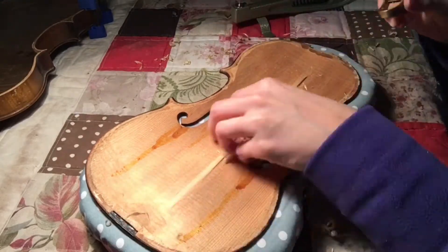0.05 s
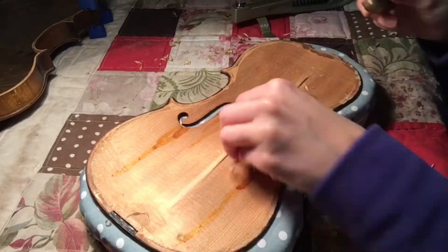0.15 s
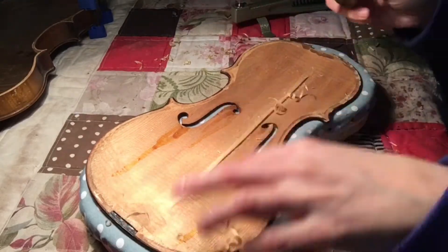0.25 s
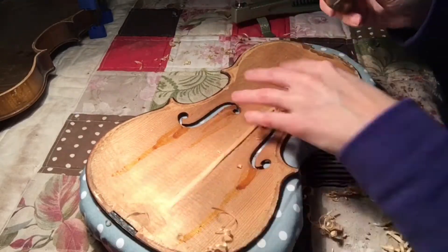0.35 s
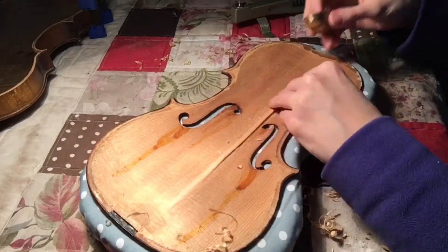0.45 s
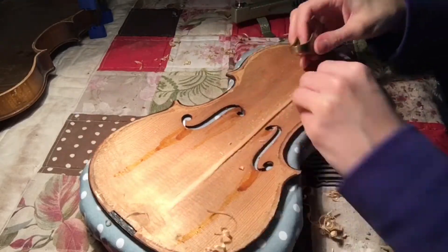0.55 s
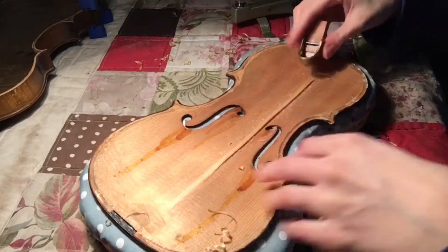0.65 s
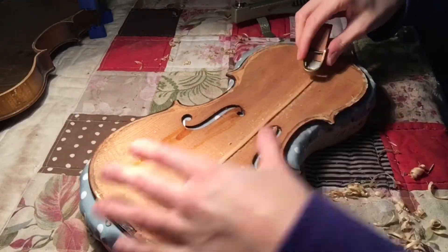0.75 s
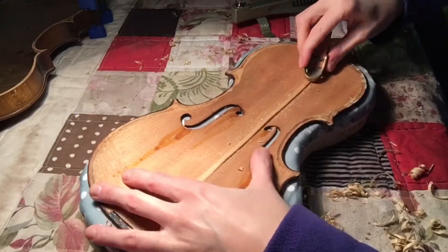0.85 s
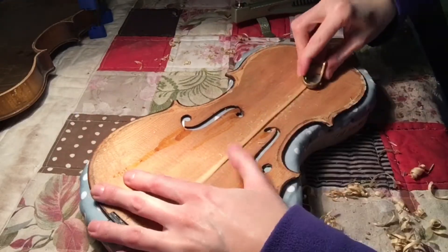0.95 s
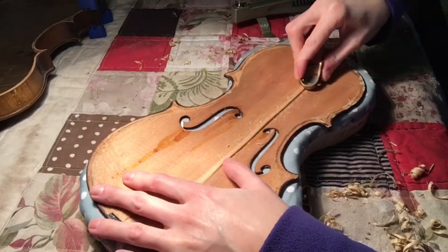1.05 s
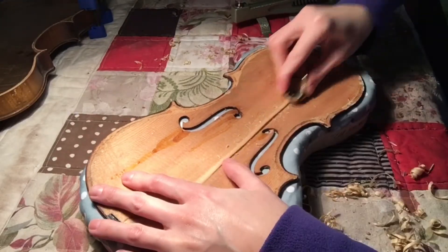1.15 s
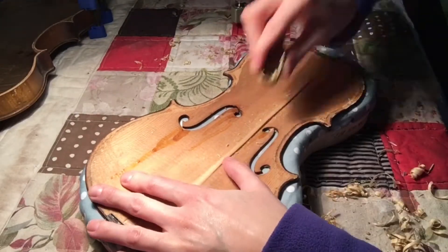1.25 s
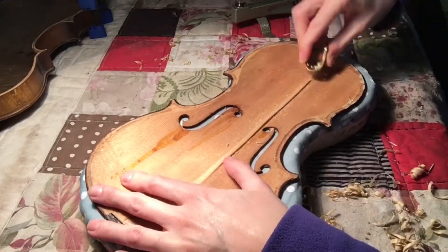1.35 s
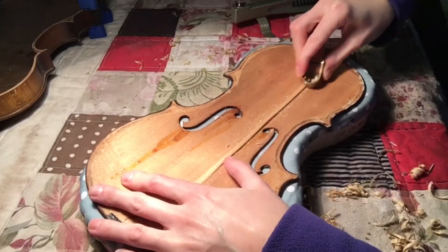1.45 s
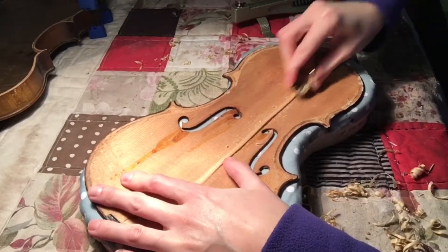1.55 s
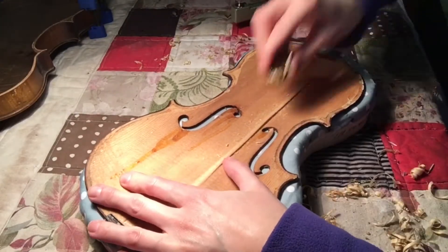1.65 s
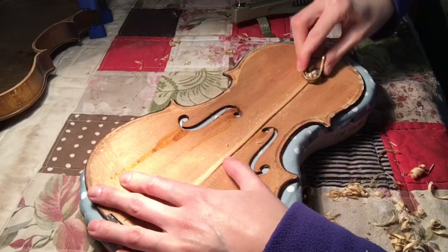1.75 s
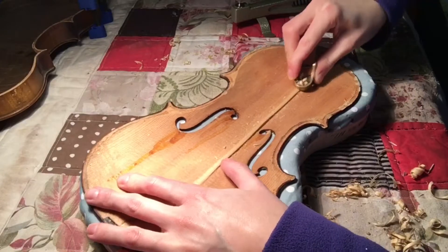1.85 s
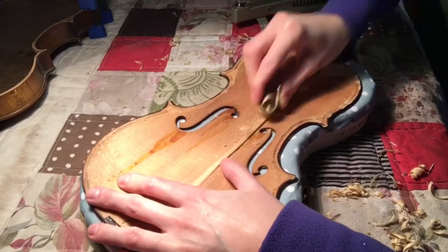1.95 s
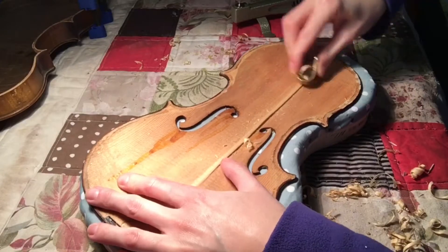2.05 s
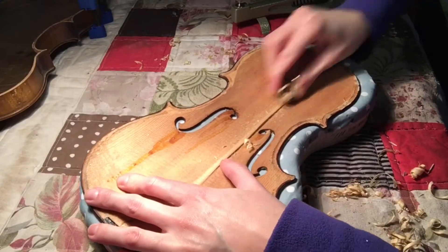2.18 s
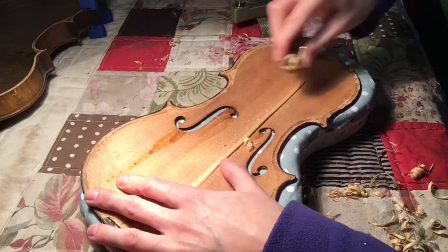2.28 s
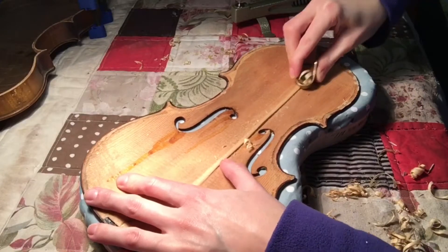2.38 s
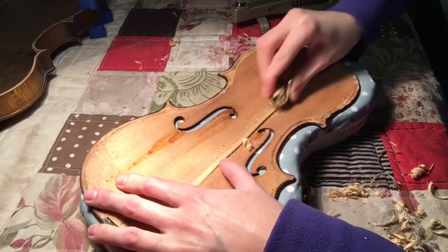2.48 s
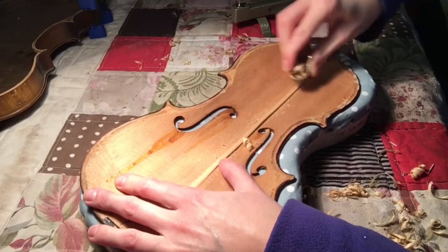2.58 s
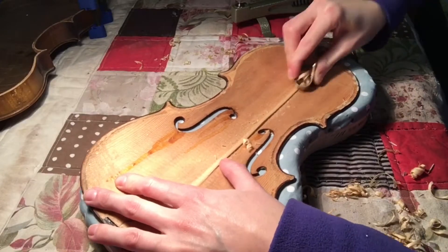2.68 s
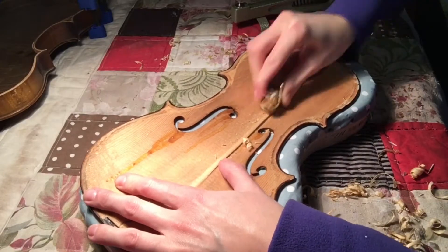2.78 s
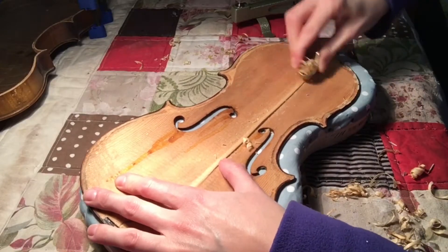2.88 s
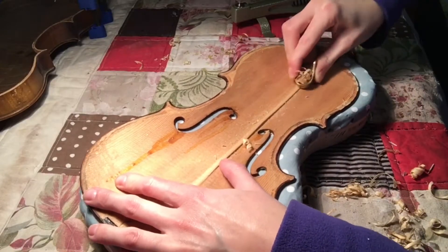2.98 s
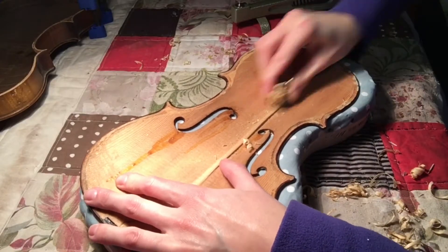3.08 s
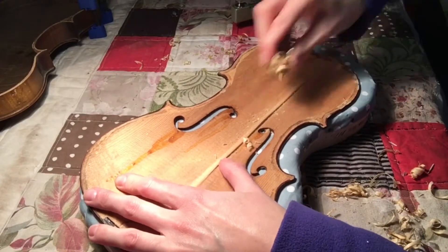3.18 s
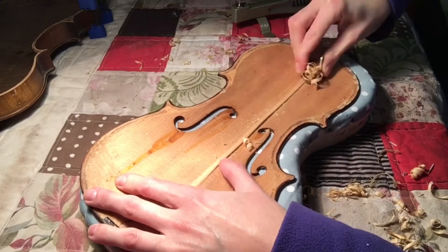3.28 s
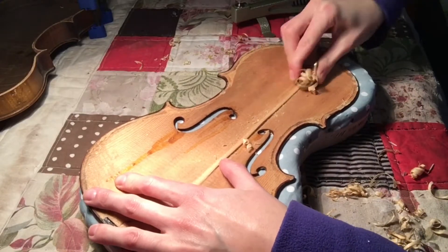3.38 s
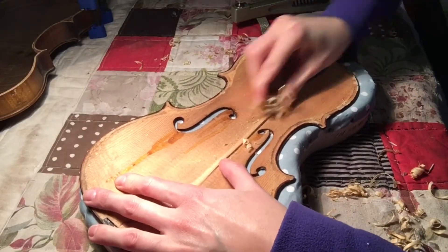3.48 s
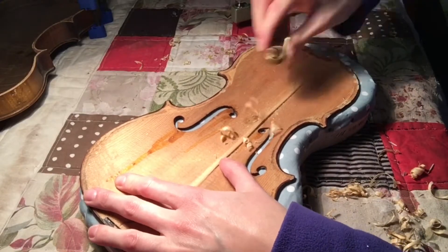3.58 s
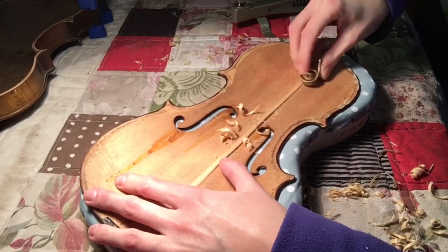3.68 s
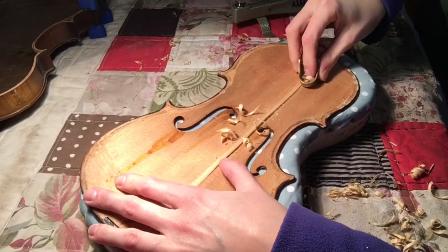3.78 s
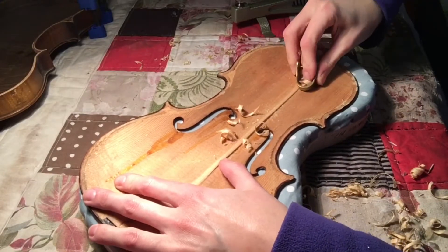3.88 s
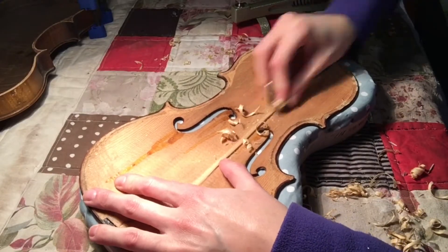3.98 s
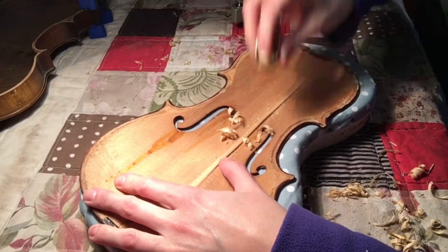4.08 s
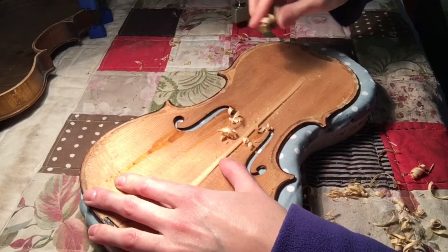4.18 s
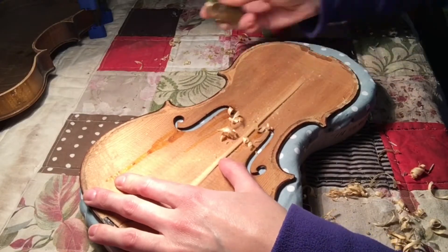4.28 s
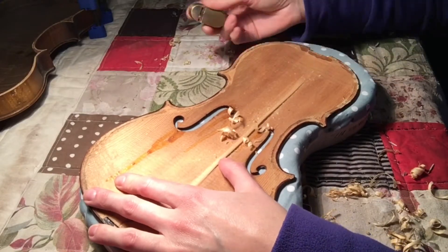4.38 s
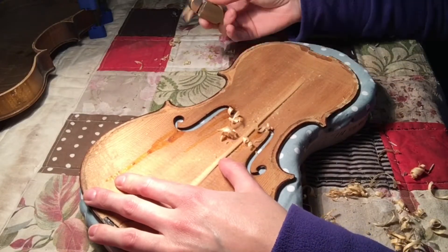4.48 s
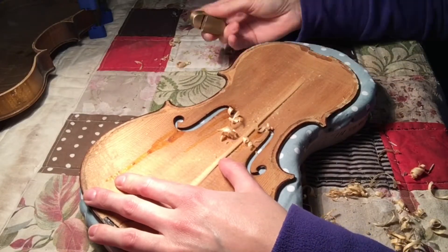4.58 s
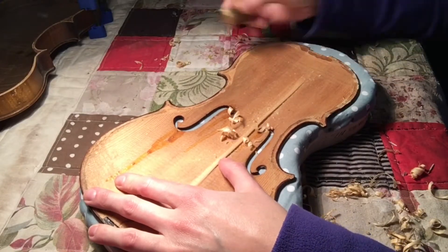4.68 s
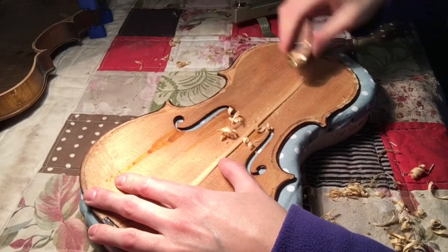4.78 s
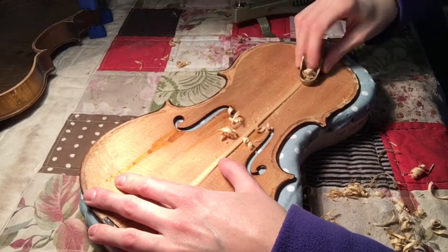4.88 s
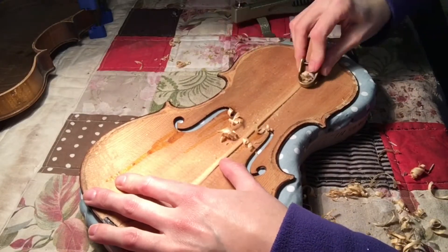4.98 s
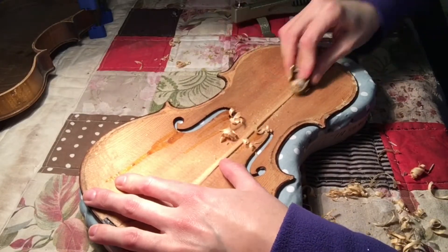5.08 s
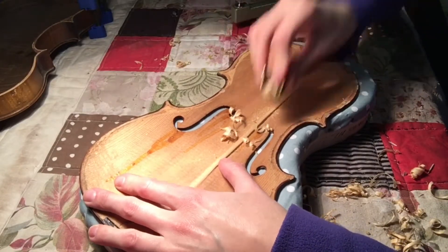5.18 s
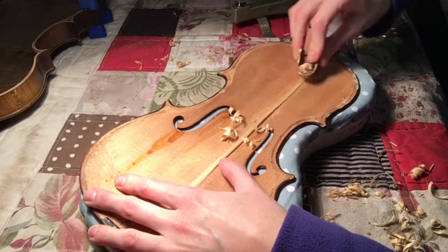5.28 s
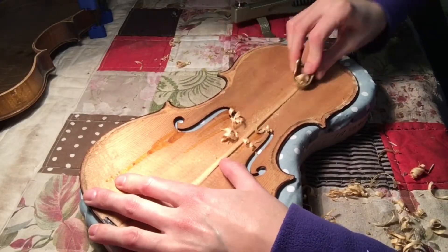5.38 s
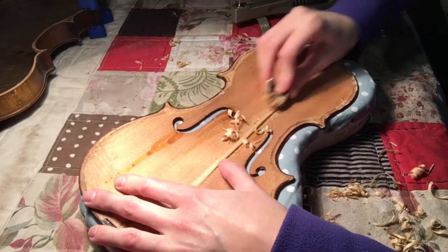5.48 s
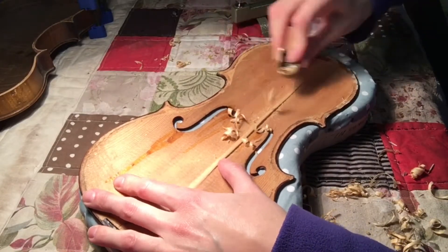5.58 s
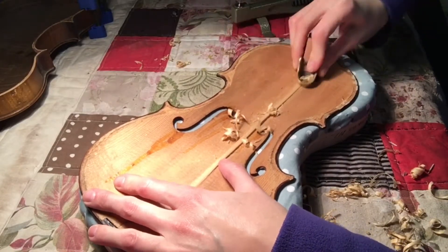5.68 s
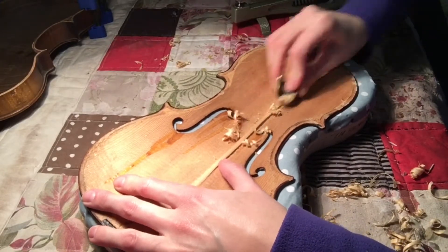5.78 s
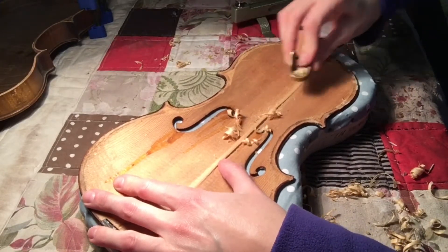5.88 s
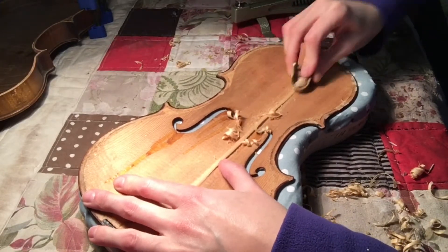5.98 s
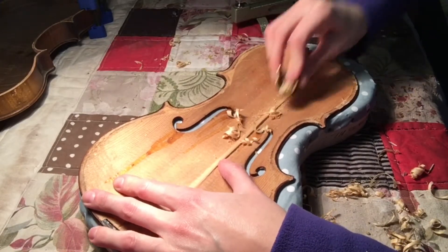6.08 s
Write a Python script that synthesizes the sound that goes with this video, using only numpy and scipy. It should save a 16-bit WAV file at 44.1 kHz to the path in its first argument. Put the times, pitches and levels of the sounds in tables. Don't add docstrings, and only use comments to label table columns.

```python
import sys
import numpy as np
from scipy import signal
from scipy.fft import rfft, irfft
from scipy.io import wavfile
from scipy.ndimage import uniform_filter1d

SR = 44100
rng = np.random.default_rng(int(sys.argv[2]) if len(sys.argv) > 2 else 0)


def natural_amplitude(level_db):
    exponent = np.asarray(level_db, float) / 20
    return 10 ** exponent


def log_audio(samples):
    frames = np.atleast_2d(samples).T
    limited = np.clip(frames, -1, 1)
    pcm = np.round(limited * 32767).astype(np.int16)
    wavfile.write(sys.argv[1], SR, pcm)


N = 270774
STEP = 20

# edge bites in seconds, time in the wood in seconds, run-up in seconds per 20 dB,
# plate bending in dB, blade chatter in dB.
CUTS = [(1.192, 0.053, 0.05, -35.5, -27.5), (1.603, 0.047, -0.017, -32.5, -33),
        (1.943, 0.033, 0.0638, -34, -32.5), (2.215, 0.044, .05, -30.5, -32.5),
        (2.476, 0.054, 0.0468, -30.5, -38), (2.758, 0.059, 0.03, -35, -34),
        (3.106, 0.053, .045, -31.5, -32.5), (3.499, 0.047, 0.0651, -30.5, -31),
        (3.992, 0.077, .09, -36.5, -34), (5.135, 0.057, 0.07, -34, -35), (5.475, 0.069, 0.0519, -34.5, -35),
        (5.796, 0.056, 0.04, -36.5, -39), (6.043, 0.055, -0.0155, -37.5, -42)]
# favoured bending in Hz, chatter in the run-up in Hz,
# chatter at the exit in Hz, fibre hiss in dB, chatter at the bite in dB.
PLACES = [(343, 1400, 1320, -44, -48), (352, 830, 1300, -44, -43.5), (396, 1600, 1540, -43.5, -41),
          (320, 1800, 1420, -44, -41), (370, 2100, 1660, -45.5, -41.5), (382, 1490, 1310, -45.5, -43.5),
          (341, 1400, 1300, -44.5, -44), (373, 1500, 1170, -44, -40), (310, 2150, 1000, -46, -47),
          (308, 940, 1430, -45, -47), (326, 1700, 1450, -45.5, -47.5), (326, 1520, 1420, -44, -39.5),
          (348, 1200, 1430, -46, -47)]
# start in seconds, length in seconds, plate in dB, hiss in dB,
# treble of the hiss in dB.
GLIDES = [(1.08, 0.051, -59.5, -63, -31), (1.291, 0.0058, -66, -56.5, -15), (1.464, .015, -68, -58.5, -7.5),
          (1.51, 0.028, -65, -64.5, 2), (1.545, 0.042, -49.5, -61.5, -1), (1.857, 0.018, -65, -61.5, -1),
          (1.906, .015, -48.5, -57, -19.5), (2.962, 0.042, -61, -70, -2.5),
          (3.005, 0.0054, -64, -55.5, -3.5), (3.328, .015, -84, -71, -17), (3.367, 0.022, -63, -65.5, -0.5),
          (3.449, 0.015, -68, -61, 6), (3.655, 0.027, -84, -72, -21), (3.759, 0.024, -62.5, -68, 2),
          (3.897, 0.0088, -60.5, -61.5, -31), (4.129, 0.043, -75, -70.5, 5.5),
          (4.934, 0.017, -68, -69, -8.5), (4.959, 0.0041, -66, -76.5, -5), (5.031, 0.0067, -72, -78, 4),
          (5.073, 0.022, -59, -60.5, -28), (5.4, 0.025, -60, -56, -2), (5.657, 0.0043, -93, -78.5, 9),
          (5.741, 0.013, -58, -55.5, -6), (6.013, 0.036, -46.5, -53, -3.5)]
# time in
# seconds, # knock in dB, chatter in dB, click in dB, contact in seconds.
LANDINGS = [(0.713, -70, -41.5, -43, 0.004), (1.04, -44, -38.5, -70, 0.0065),
            (1.088, -71.5, -30, -44, 0.019), (1.133, -45.5, -33, -36.5, 0.0082),
            (1.464, -55, -62, -64, 0.0083), (1.592, -30, -34, -36, 0.01), (1.816, -34.5, -46, -63.5, 0.004),
            (2.123, -30, -31, -45.5, 0.0096), (2.206, -22, -47, -40, 0.012), (2.386, -52, -50, -62, 0.0077),
            (2.408, -25, -21.5, -44, 0.0047), (2.674, -34.5, -34, -41.5, 0.0097),
            (2.734, -36.5, -48, -45, 0.0088), (2.714, -46, -52, -52, 0.01),
            (2.928, -55.5, -58, -74.5, 0.014), (5.358, -52, -51, -62.5, .008),
            (2.452, -54, -50, -52, 0.0065), (3.72, -28, -27, -42, 0.013), (4.041, -32, -23, -36, 0.018),
            (5.379, -30, -31.5, -45.5, 0.0065), (5.715, -32.5, -31.5, -40, 0.0098),
            (5.79, -23, -28, -34, 0.0057), (5.983, -34, -36, -58, 0.014), (6.003, -29, -26, -63, 0.0031)]
# pitch in Hz, width in Hz, level in dB.
BENDING = [(97, 13, -3.5), (136.4, 10.8, 4), (194.5, 19.7, 2), (249.5, 26, -3.5), (328.4, 31.4, -5),
           (395, 30, -8), (451.6, 46, -5), (502.5, 29, -2.5), (569, 44, -5), (656, 32, -2), (713, 57, -7)]
# pitch in Hz, width in Hz, level in dB.
CHATTER = [(836, 136, -7), (1008, 87, -2.5), (1093, 52, 0.5), (1242, 106, -0.5), (1316, 86, 1.5),
           (1436, 87, -6), (1490, 25, -16), (1512, 103, -1.5), (1647, 116, 0), (1766, 93, -3),
           (2035, 120, -5.5), (2319, 40, -9)]
# pitch in Hz, width in Hz, level in dB.
AFTER_RING = [(1425, 10, -1)]
# pitch in Hz, width in Hz, level in dB.
METAL_RINGS = [(2840, 110, 2), (3530, 110, 3), (4150, 120, -3), (5450, 150, -1), (6350, 130, -1),
               (8480, 120, -1)]
# pitch in Hz, level in dB per Hz.
FIBRES = [(1290, -18.5), (2200, -2.5), (3210, -5.5), (4030, -2.5), (4950, -5), (5640, -3), (7950, -9.5),
          (8770, -10.5), (12500, -17.5), (15600, -17.5)]
# pitch in Hz, width in Hz, level in dB.
KNOCK = [(252, 63, -7), (335, 70, -10), (447, 76, -2), (650, 100, -6), (850, 120, -11)]
# pitch in Hz, level in dB per Hz.
CLICK = [(1060, -28.5), (1800, -1), (2490, 0.5), (2900, 7.5), (4090, -2.5), (5130, -3.5), (8500, -13),
         (15600, -51)]
# time in seconds, level in dB.
SHOVES = [(.17, -84), (.58, -70), (1.152, -57), (1.27, -54), (1.59, -55), (1.69, -79), (1.95, -47.5),
          (2.25, -56), (2.52, -62), (2.8, -59.5), (3.1, -55), (3.46, -56.5), (3.56, -61), (3.96, -55),
          (4.1, -56), (5.17, -49), (5.48, -55), (5.84, -43), (6.1, -45)]
# start in seconds, length in seconds, fade in seconds per 20 dB,
# rustle in dB, crisp top in dB.
HAND = [(0.096, 0.043, 0.1, -46.5, -55), (0.188, 0.016, 0.05, -74, -65), (.25, 0.081, .08, -93, -73.5),
        (0.443, 0.011, 0.12, -64, -93), (0.47, 0.077, 0.03, -57.5, -59.5), (0.63, 0.017, 0.5, -88, -87),
        (0.597, 0.0086, 0.0351, -55, -57), (0.717, 0.005, 0.02, -55, -56.5),
        (0.858, 0.046, 0.03, -61, -70.5), (0.945, 0.0066, -0.36, -64.5, -70),
        (0.966, 0.01, 0.37, -57.5, -67.5), (4.23, 0.015, 0.2, -86, -79), (4.599, .006, 0.4, -81.5, -84.5)]
# pitch in Hz, level in dB per Hz.
RUSTLE = [(59, -48), (100, -19), (124, -6.5), (161, -16), (489, -12.5), (1060, 1), (1150, -3), (1440, -1),
          (2350, -9.5), (3320, -7), (5000, -24), (6500, -49), (11000, -120)]
# pitch in Hz, level in dB per Hz.
CRISP = [(2060, -18), (3500, -10.5), (3870, -8), (4440, -1.5), (4930, -7.5), (5950, 1.5), (8490, -12),
         (15600, -14)]
# start in seconds, length in seconds,
# fade in seconds per 20 dB, level in dB.
PICKS = [
    (0.689, 0.01, 0.04, -64),
    (4.448, 0.016, 0.1, -72),
    (4.485, 0.0089, 0.12, -70),
    (4.512, 0.016, 0.02, -60),
    (4.652, 0.016, 0, -73),
    (4.679, 0.021, .04, -70),
]
# pitch in Hz, level in dB per Hz.
PICKING = [(710, -26), (1200, -4), (1280, -15), (1410, -7), (1800, -1), (2260, -4), (6260, -0.5),
           (15600, -8.5)]
# time in seconds, pitch in Hz, level in dB.
TICKS = [
    (4.652, 8480, -65),
    (5.655, 4100, -63),
]
# pitch in Hz, level in dB per Hz.
SHOP = [(15, -44.5), (25, -19), (49, -6), (70, -21), (91, -12), (133, -13), (282, -14), (323, -13),
        (422, -17.5), (873, -21), (999, -23), (1420, -21), (15600, -44)]

SLIPS_PER_S, SLIP_SCATTER_DB, JUDDER_DB = 4400, 1.5, 1.8
PATCH_DB = 2.2
BEND_EXIT_DB, BEND_FALL_S, BEND_TAIL_DB, BEND_TAIL_S = -43.5, 0.039, -22.5, 0.11
CHATTER_TOP_S, CHATTER_FALL_S, CHATTER_TAIL_DB, CHATTER_TAIL_S = 0.014, 0.032, -29, 0.12
HISS_GROWS_DB, HISS_FALL_S, TREBLE_HZ = 4, 0.043, 4420
GLIDE_RISE_S, GLIDE_FALL_S = 0.027, 0.022
BEND_TRAVEL, BITE_CHATTER_HZ, LIFT_BEND_HZ, LIFT_CHATTER_HZ, LIFT_S = 1.034, 1520, 190, 1280, 0.073
SWELL_DB, SWELL_RISE_S, SWELL_FALL_S = -16.5, 0.045, 0.06
TABLE_HZ, TABLE_WIDTH_HZ = 59, 16
ROCK_REST_DB, ROCK_HOLD_S, ROCK_RISE_S, ROCK_FALL_S = -81, 0.027, 0.1, 0.093
PICK_RISE_S = 0.023
SHOP_DB = -73.5
ROOM_T60_S, ROOM_DB = 0.21, -23.5


def plane():
    bend, chatter, hiss, treble = forces()
    bend_hz, chatter_hz = travel()
    on_wood = np.arange(N) > (GLIDES[0][0] - 2 * GLIDE_RISE_S) * SR
    grip = natural_amplitude(JUDDER_DB * walk(90))
    catch = catches(260, 0.3, 0.87)
    blade = (unit(slips(SLIPS_PER_S, SLIP_SCATTER_DB)) + 0.8 * catch) * grip ** 1.16 * on_wood
    sole = (catch + 0.77 * unit(slips(2500, 0.97))) * grip * on_wood
    fibres = (unit(slips(18000, 0.35)) + 0.36 * catch) * grip ** 0.24 * on_wood
    fibres = patchy(fibres, PATCH_DB, 18)
    low_reach = coupling(BENDING, bend_hz, 0.21, 0.53)
    high_reach = coupling(CHATTER, chatter_hz, 0.2, 0.72)
    plate = driven(sole, bend, lambda x: ring(x, BENDING, low_reach))
    plate += driven(patchy(blade, PATCH_DB, 30), chatter, lambda x: ring(x, CHATTER, high_reach))
    tearing = driven(fibres, hiss, lambda x: colour(metal(x), FIBRES))
    top = signal.sosfilt(signal.butter(2, TREBLE_HZ, "high", fs=SR, output="sos"), tearing)
    low = signal.sosfilt(signal.butter(2, TREBLE_HZ, "low", fs=SR, output="sos"), tearing)
    return plate + ring(plate, AFTER_RING) + low - top * treble / hiss + landings()


def forces():
    out = 0
    for (s, hold, rise, bend_db, chatter_db), (*_, hiss_db, bite_db) in zip(CUTS, PLACES):
        bend = shape(s, hold, rise, BEND_FALL_S, bend_db, BEND_EXIT_DB)
        bend_tail = shape(s, hold, rise, BEND_TAIL_S, bend_db + BEND_TAIL_DB)
        growing = shape(s, hold - CHATTER_TOP_S, 0.99 * rise, CHATTER_FALL_S, bite_db, chatter_db)
        scream = shape(s + hold - CHATTER_TOP_S, CHATTER_TOP_S, 0.01, CHATTER_FALL_S, chatter_db)
        chatter_tail = shape(s, hold, rise, CHATTER_TAIL_S, chatter_db + CHATTER_TAIL_DB)
        hiss = shape(s, hold, 1.23 * rise, HISS_FALL_S, hiss_db - HISS_GROWS_DB, hiss_db)
        treble = shape(s, hold, 0.89 * rise, 0.58 * HISS_FALL_S, hiss_db - HISS_GROWS_DB, hiss_db)
        chatter = np.maximum(growing, scream) + chatter_tail
        out = out + np.array([bend + bend_tail, chatter, hiss, treble])
    for s, hold, plate_db, hiss_db, treble_db in GLIDES:
        db = np.array([plate_db, plate_db - 0.7, hiss_db, hiss_db + treble_db])
        out = out + natural_amplitude(db)[:, None] * shape(s, hold, GLIDE_RISE_S, GLIDE_FALL_S, 0)
    return full(out, 0.0092)


def travel():
    s, hold, rise = np.transpose(CUTS)[:3]
    bend, early, late = np.transpose(PLACES)[:3]
    at = np.transpose([s - rise, s, s + hold, s + hold + LIFT_S]).ravel()
    low = [bend * BEND_TRAVEL ** 2, bend * BEND_TRAVEL, bend, np.full_like(s, LIFT_BEND_HZ)]
    high = [early, np.full_like(s, BITE_CHATTER_HZ), late, (late + LIFT_CHATTER_HZ) / 2]
    t = np.arange(N) / SR
    return [np.interp(t, at, np.transpose(hz).ravel()) for hz in (low, high)]


def catches(per_s, jitter, scatter_db):
    chance = rng.standard_normal((N // 50, 2)).T
    at = np.cumsum(SR / per_s * np.exp(jitter * chance[0])).astype(int)
    force = np.zeros(N)
    force[at[at < N]] = natural_amplitude(scatter_db * chance[1])[at < N]
    return unit(force - force.mean())


def slips(per_s, scatter_db):
    happens = rng.random(N) < per_s / SR
    return happens * rng.standard_normal(N) * natural_amplitude(scatter_db * rng.exponential(size=N))


def metal(x):
    return x + 0.5 * ring(x, METAL_RINGS, (-1) ** np.arange(len(METAL_RINGS)))


def landings():
    t = np.arange(0, N + STEP, STEP) / SR
    push = 0
    for s, knock_db, chatter_db, click_db, contact in LANDINGS:
        u = (t - s - 0.004) / np.clip(contact, 0.002, 0.03)
        press = np.exp(-np.where(u < 0, 1.32 * u ** 2, np.sqrt(1 + (1.52 * u) ** 2) - 1))
        faint_swell = shape(s, contact, SWELL_RISE_S, SWELL_FALL_S, SWELL_DB)
        push = push + natural_amplitude(np.array([[knock_db], [chatter_db], [click_db]]) - 11) * (press + faint_swell)
    knock_push, chatter_push, click_push = full(push, 0.001)
    scuff = slips(15000, 0.46)
    reach = coupling(CHATTER, 1470.0, 0.1, 1.0)
    knock = driven(scuff, knock_push, lambda x: ring(x, KNOCK))
    chatter = driven(scuff, chatter_push, lambda x: ring(x, CHATTER, reach))
    click = driven(scuff, click_push, lambda x: colour(metal(x), CLICK))
    return knock + chatter + click


def table():
    shove = 0
    for s, db in SHOVES:
        shove = shove + shape(s - ROCK_HOLD_S / 2, ROCK_HOLD_S, ROCK_RISE_S, ROCK_FALL_S, db)
    gain = natural_amplitude(ROCK_REST_DB) + full(shove, 0.027)

    def rock(x):
        return ring(ring(x, [(TABLE_HZ, TABLE_WIDTH_HZ, 0)]), [(TABLE_HZ, 30, 0)])

    return driven(rng.standard_normal(N), gain, rock)


def hand():
    gain = 0
    for s, hold, fade, *db in HAND:
        gain = gain + natural_amplitude(np.array(db))[:, None] * shape(s, hold, 0.033, fade, 0)
    rustle, crisp = full(gain, 0.008)
    curls = patchy(slips(15000, 0.47), PATCH_DB, 21)
    return rustle * unit(colour(curls, RUSTLE)) + crisp * unit(colour(curls, CRISP))


def picking():
    gain = full(sum(shape(s, hold, PICK_RISE_S, fade, db) for s, hold, fade, db in PICKS), 0.0066)
    return gain * unit(colour(slips(12000, 0.8), PICKING))


def ticks():
    t = np.arange(N) / SR
    out = 0
    for s, hz, db in TICKS:
        decay = (t > s) * np.exp(-abs(t - s) / 0.0084)
        out = out + natural_amplitude(db) * decay * np.sin(2 * np.pi * hz * t)
    return out


def shop():
    return natural_amplitude(SHOP_DB + 0.8 * walk(3)) * unit(colour(rng.standard_normal(N), SHOP))


def unit(x):
    return x / np.sqrt(np.mean(x ** 2))


def colour(x, points):
    hz, db = np.transpose(points)
    f = np.arange(N // 2 + 1) * SR / N + 1
    return irfft(rfft(x) * natural_amplitude(np.interp(np.log(f), np.log(hz), db, left=-90, right=-90)), N)


def ring(force, modes, reach=None):
    out = 0
    for k, (hz, width_hz, db) in enumerate(modes):
        push = force if reach is None else force * reach[k]
        b, a = signal.iirpeak(hz, hz / width_hz, SR)
        out = out + (-1) ** k * natural_amplitude(db) * signal.lfilter(b, a, push)
    return out


def coupling(modes, favoured_hz, spread, rest):
    hz, width_hz, db = np.transpose(modes)[:, :, None]
    reach = rest + np.exp(-0.5 * (np.log(hz / favoured_hz) / spread) ** 2)
    power = natural_amplitude(db) ** 2 * width_hz
    return reach * np.sqrt(power.sum() / (power * reach ** 2).sum(axis=0))


def driven(source, gain, filt):
    return filt(source * gain) / np.sqrt(np.mean(filt(source) ** 2))


def patchy(x, depth_db, rate):
    spectrum = rfft(x)
    octave = np.log2(np.arange(N // 2 + 1) * SR / N + 1).clip(8)
    out = 0
    for centre in np.arange(8, 14.4, 1 / 8):
        share = np.clip(1 - 8 * abs(octave - centre), 0, 1)
        out = out + natural_amplitude(depth_db * walk(rate)) * irfft(spectrum * share, N)
    return out


def walk(rate):
    k = int(SR / rate)
    held = np.repeat(rng.standard_normal(N // k + 1), k)
    return unit(uniform_filter1d(uniform_filter1d(held, k), k)[:N])


def shape(s, hold, rise, fall, db, end_db=None):
    t = np.arange(0, N + STEP, STEP) / SR
    hold, rise, fall = np.clip([hold, rise, fall], 0.001, None)
    along = np.clip((t - s) / hold, 0, 1) * (0 if end_db is None else end_db - db)
    before = 20 * np.clip(s - t, 0, None) / rise
    after = 20 * np.clip(t - s - hold, 0, None) / fall
    return natural_amplitude(db + along - before - after)


def full(control, round_s):
    return uniform_filter1d(np.repeat(control, STEP, axis=-1), max(int(round_s * SR), 1))[..., :N]


def scene():
    near = plane() + hand() + ticks()
    t = np.arange(SR // 2) / SR
    tail = rng.standard_normal(len(t)) * natural_amplitude(-60 * t / ROOM_T60_S) * (t > 0.004)
    tail = signal.lfilter([1], [1, -0.6], tail)
    room = signal.fftconvolve(near, tail / np.sqrt(np.sum(tail ** 2)))[:N]
    return (near + natural_amplitude(ROOM_DB) * room + table() + shop() + picking())[None]


def band_limit(x):
    return signal.sosfilt(signal.butter(12, 15710, fs=SR, output="sos"), x)


def record(dry):
    soft = 0.3 * np.tanh(dry / 0.3)
    return band_limit(soft)


dry = scene()
out = record(dry)
log_audio(out)
```